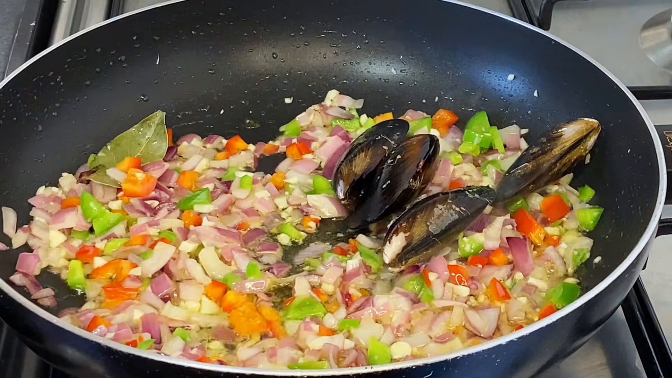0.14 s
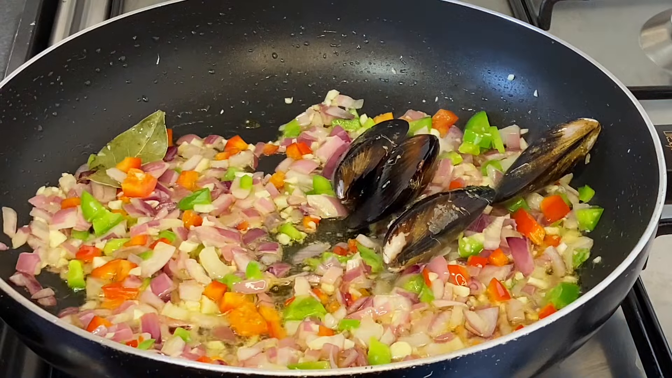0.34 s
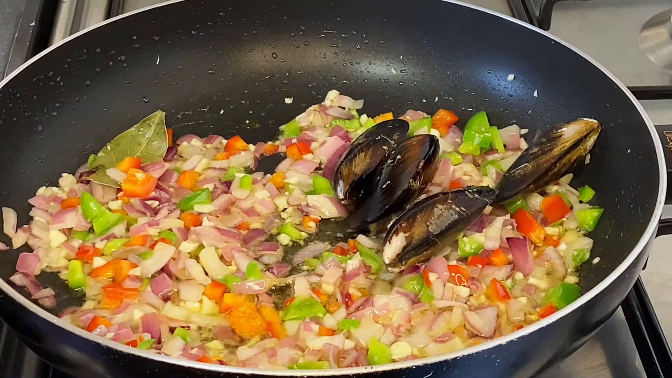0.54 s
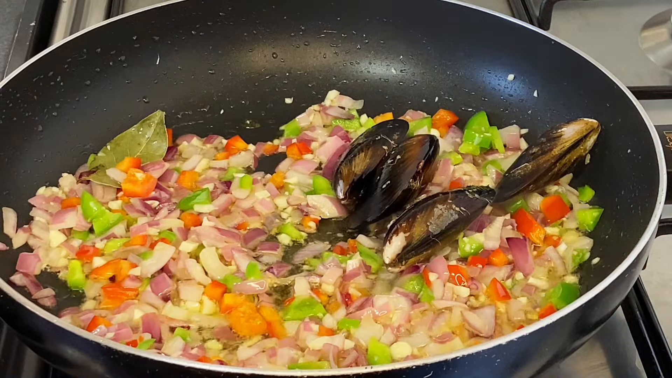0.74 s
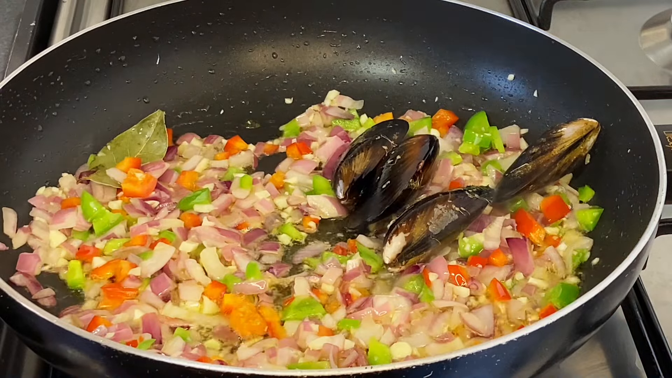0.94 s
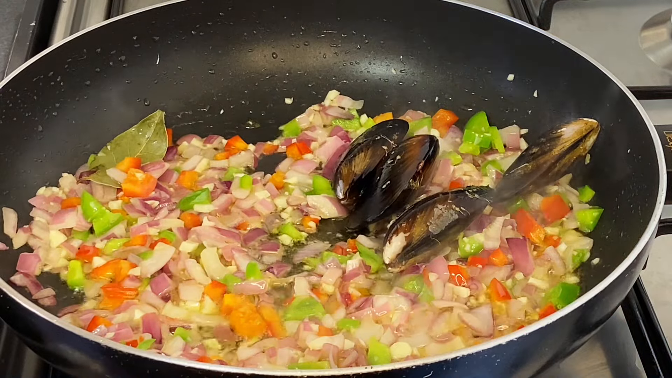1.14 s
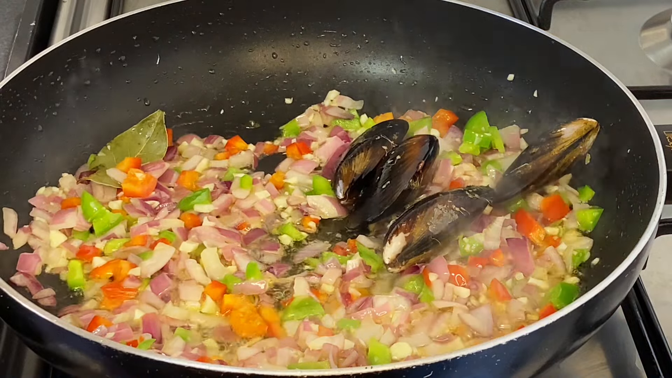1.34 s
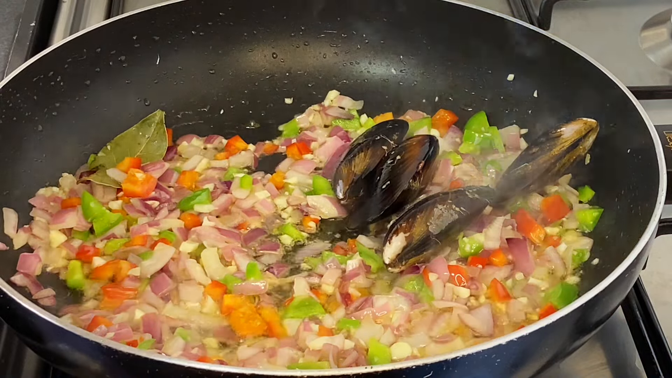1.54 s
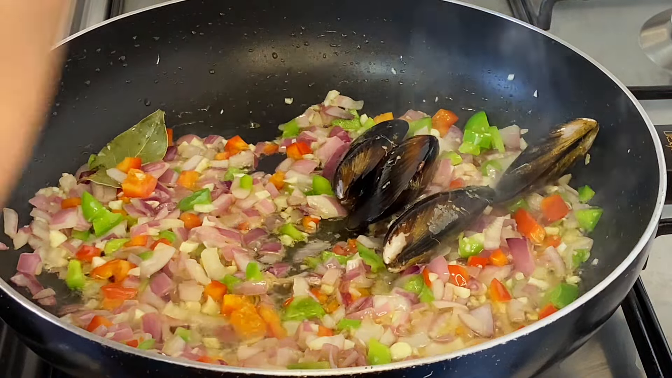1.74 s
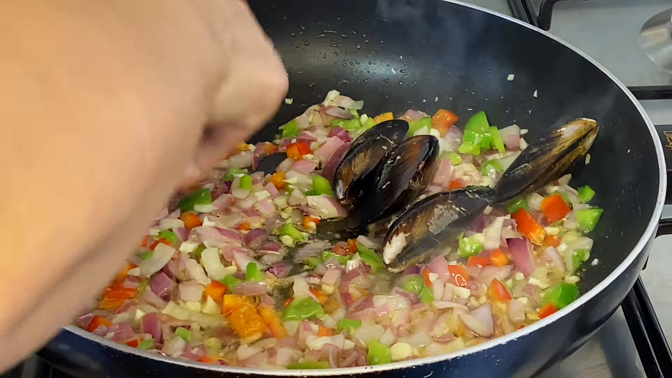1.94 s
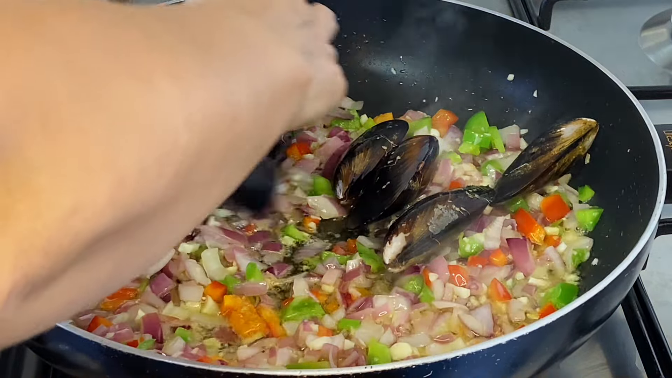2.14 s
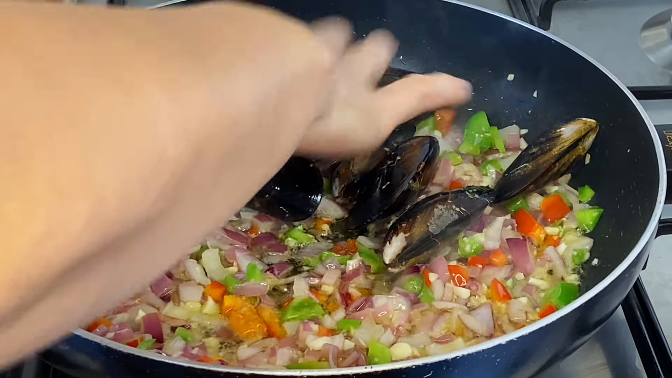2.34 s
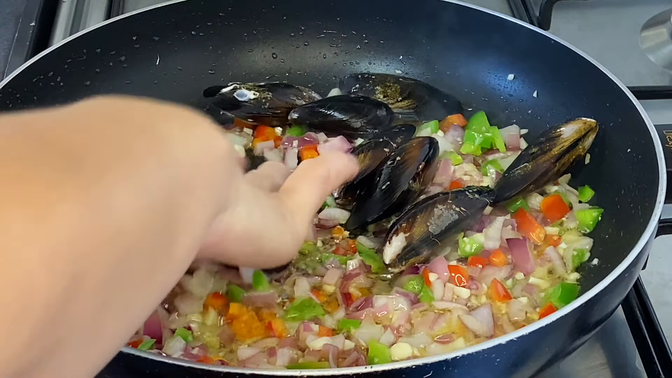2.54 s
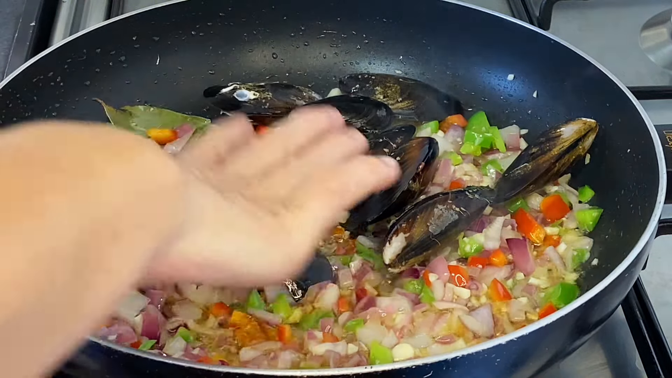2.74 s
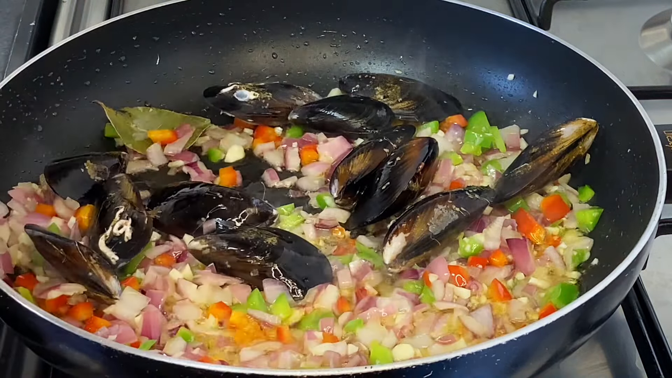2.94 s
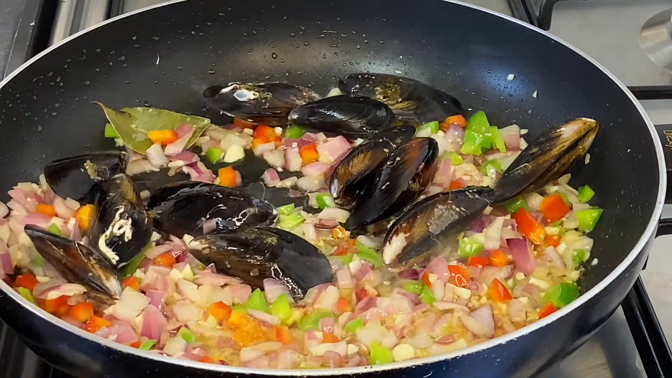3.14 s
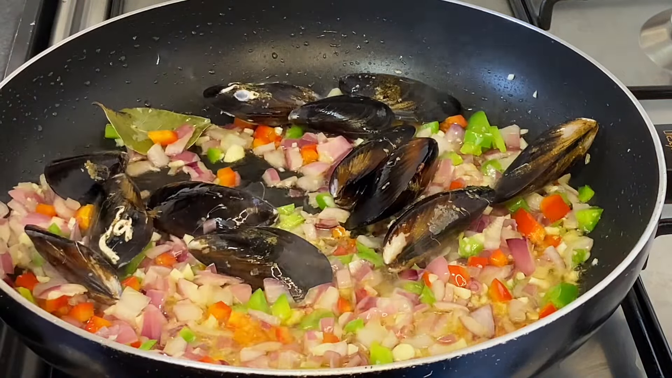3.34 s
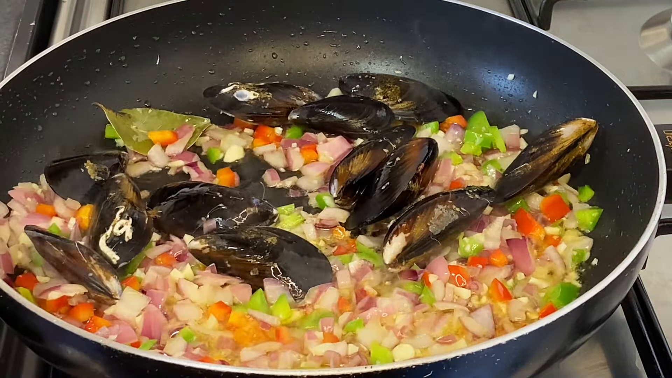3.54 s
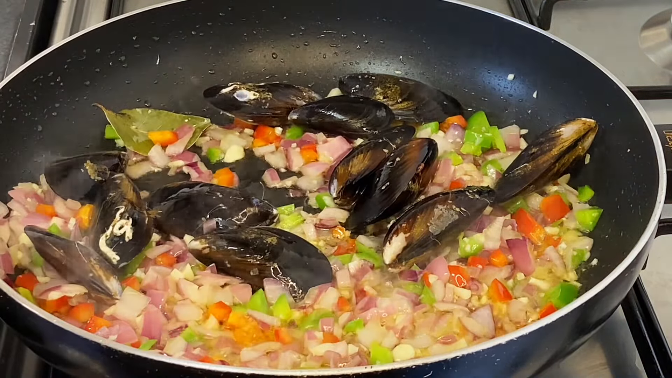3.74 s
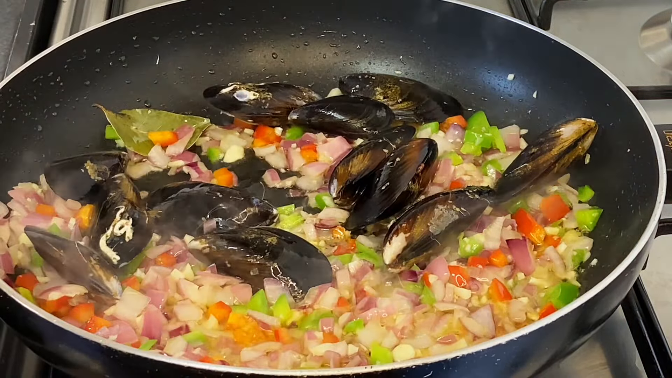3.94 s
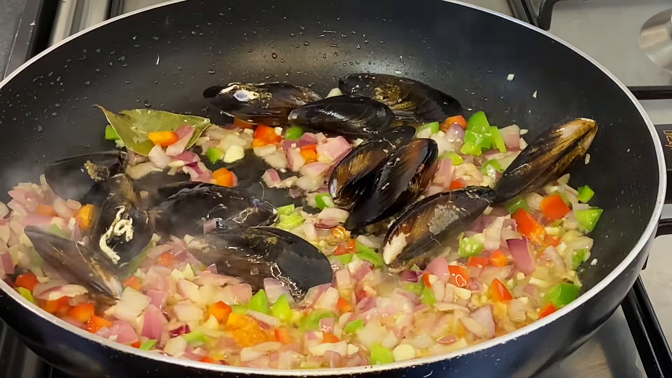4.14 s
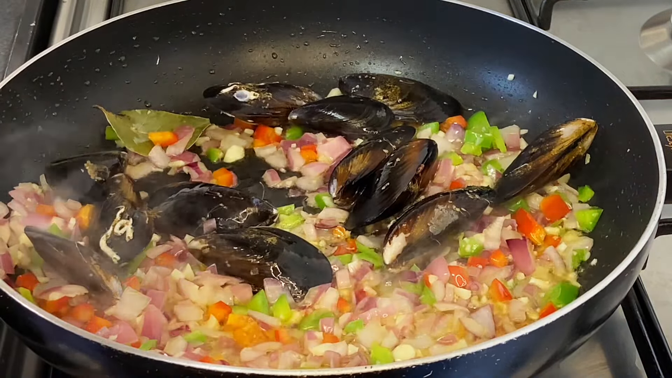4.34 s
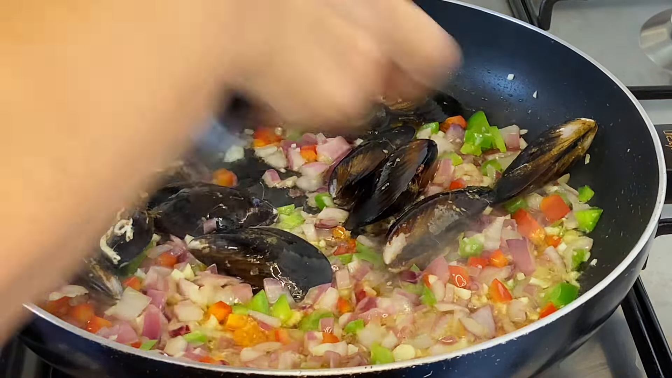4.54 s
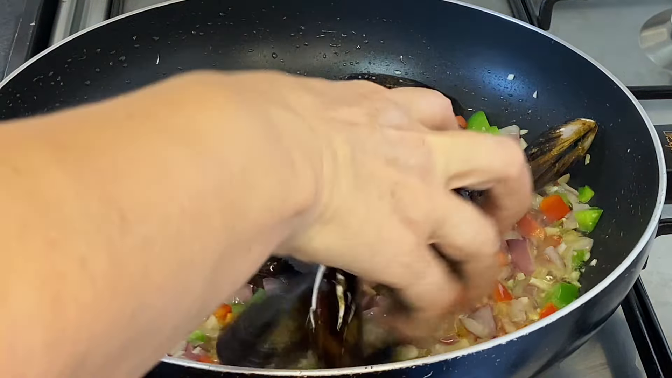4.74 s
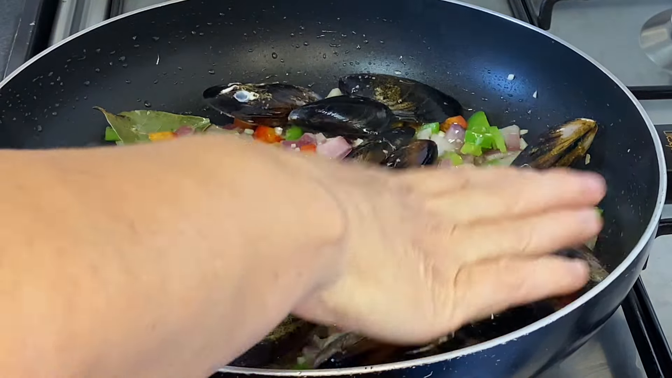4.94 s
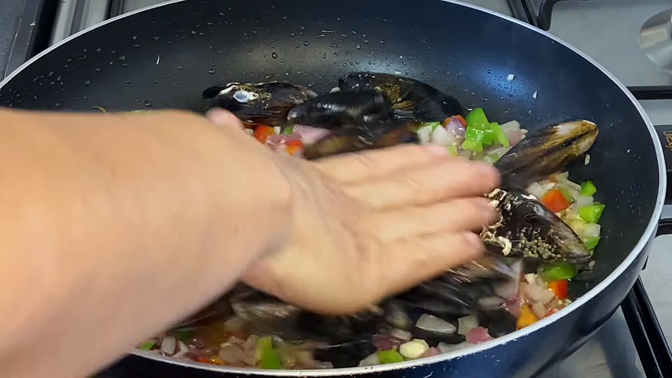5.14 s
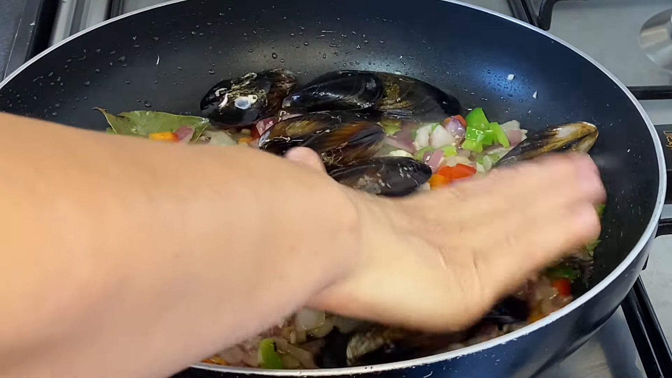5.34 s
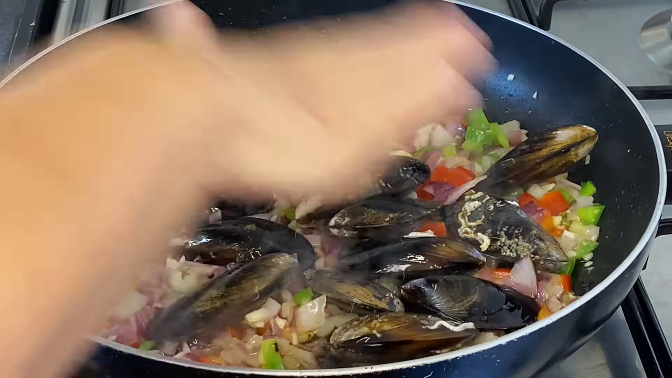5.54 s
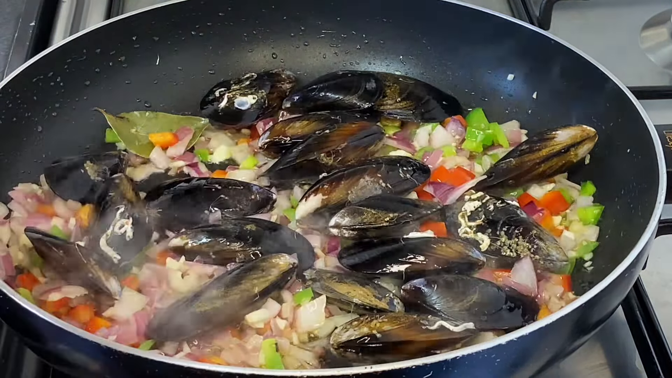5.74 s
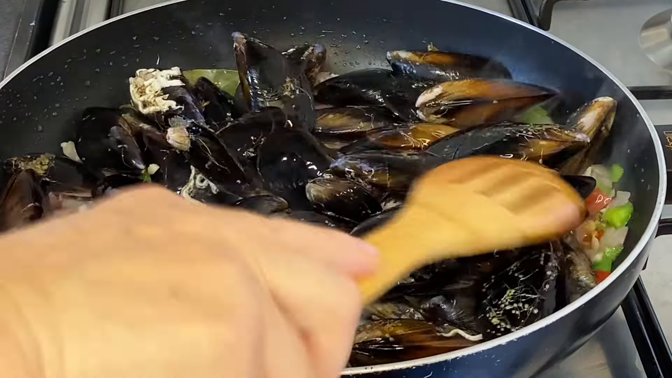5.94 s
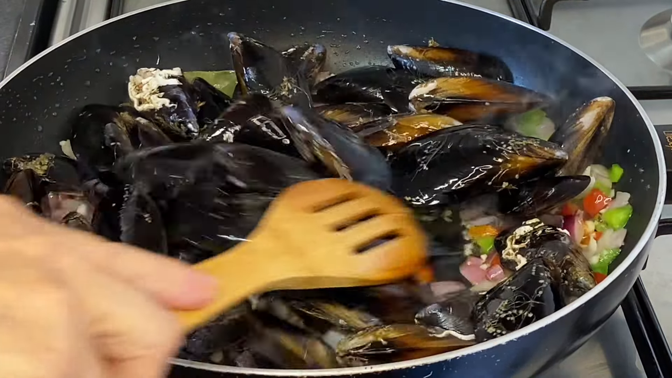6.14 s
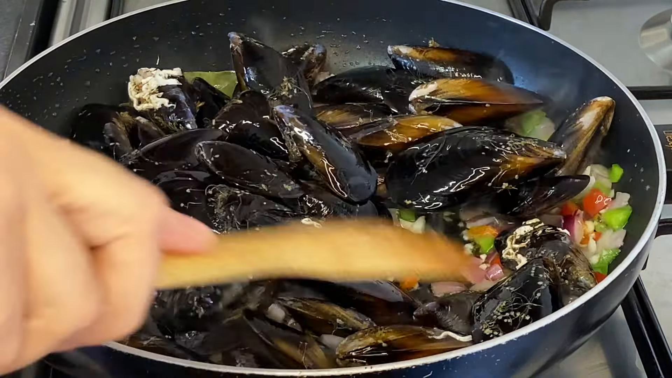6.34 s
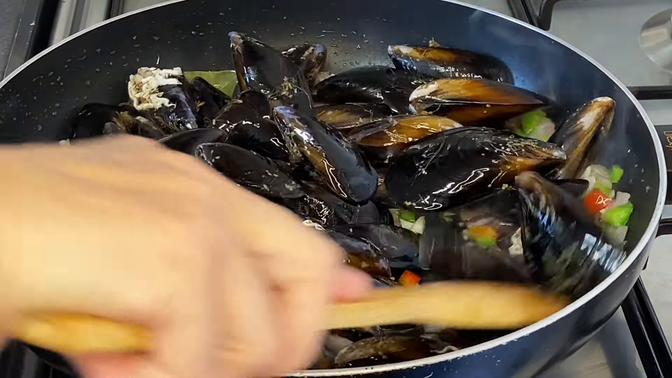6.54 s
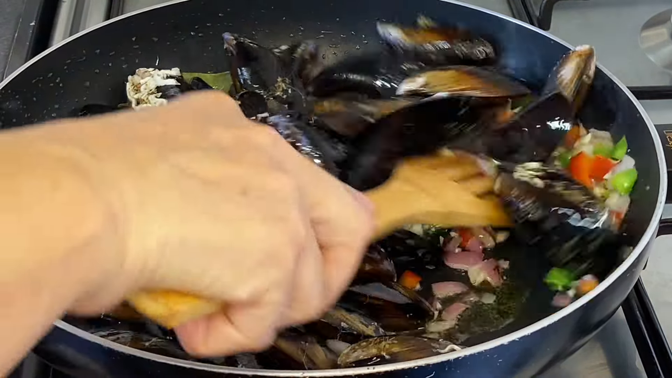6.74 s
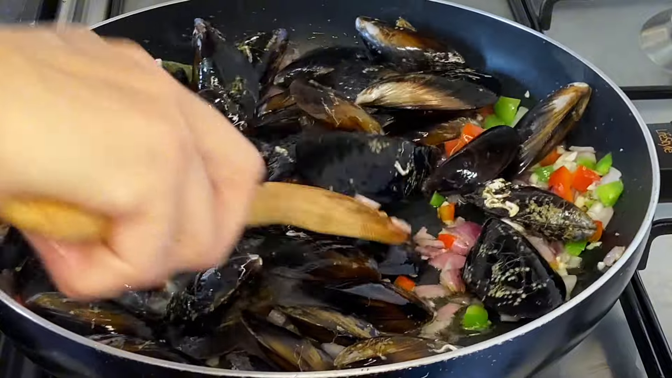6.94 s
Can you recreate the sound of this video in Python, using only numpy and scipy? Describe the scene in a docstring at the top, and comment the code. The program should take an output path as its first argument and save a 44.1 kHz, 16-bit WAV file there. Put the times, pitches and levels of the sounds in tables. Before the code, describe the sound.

A close frying pan of onions and peppers sizzles steadily over a low gas flame. Beside it, mussel shells knock and rub in a bowl, then a handful drops with sharp clacks, short damped metal rings and dull thuds. More bowl rattling follows, then a second handful lands. Finally a wooden spatula bumps the pan and turns the shells with scrapes and taps. Small kitchen, close stereo microphone.

```python
"""Mussels drop into a frying pan in two handfuls: each shell clacks, rings the metal and thuds.
Then a wooden spatula knocks on the pan and stirs the shells, which slide, scrape and tap each other.
Before each handful a hand gathers mussels from a bowl beside the hob, and the shells knock together.
Onions and peppers sizzle throughout as tiny bursts of noise; behind them are a gas flame and a low hum.
Blows are short noise bursts through resonances, ringing is dying sine waves, and echoes add a small kitchen."""
import sys
import numpy as np
from scipy import signal
from scipy.fft import rfft, irfft
from scipy.io import wavfile
from scipy.ndimage import map_coordinates

SR = 44100
rng = np.random.default_rng(int(sys.argv[2]) if len(sys.argv) > 2 else 0)


def pcm_store(signal):
    """Save signal as 16-bit PCM."""
    levels = np.round(np.clip(np.atleast_2d(signal), -1, 1) * 32767)
    wavfile.write(sys.argv[1], SR, levels.astype(np.int16).T)


N = 312210
NOW = np.arange(N) / SR  # time within the scene, s
T = np.arange(SR // 2) / SR  # time within one blow, s
# In every table of events, levels are set before the echoes and any overall gain of that layer.


def amp(db):
    """Turns decibels into gain."""
    return 10 ** (np.asarray(db) / 20)


def evened(x):
    """Scales a sound to rms 1."""
    return x / np.sqrt(np.mean(x ** 2) + 1e-20)


def struck(x):
    """Scales a short sound to the energy of 4 ms at rms 1."""
    return x / np.sqrt(np.sum(x ** 2) / (.004 * SR) + 1e-20)


def read(points, hz):
    """Reads a table between its points, on a log-frequency axis."""
    f, value = np.transpose(points)
    return np.interp(np.log(hz + 1), np.log(f + 1), value)


def colour(x, points):
    """Filters a sound by a table of (frequency [Hz], level [dB])."""
    gain = amp(read(points, np.fft.rfftfreq(N, 1 / SR)))
    return irfft(rfft(x) * gain, N)


def band(x, hz, octaves, order=1):
    """Keeps a band around one pitch, like a broad resonance."""
    edges = np.clip([hz / 2 ** (octaves / 2), hz * 2 ** (octaves / 2)], 10, SR / 2 - 10)
    return signal.sosfilt(signal.butter(order, edges, "band", fs=SR, output="sos"), x)


def low_cut(x, hz):
    """Removes bass, since small things radiate little of it."""
    return signal.sosfilt(signal.butter(2, hz, "high", fs=SR, output="sos"), x)


def add(mix, s, sound):
    """Mixes a sound in at time s."""
    part = mix[max(round(s * SR), 0):][:len(sound)]
    part += sound[:len(part)]


def grains(per_s, spread_db):
    """Makes clicks at random times, of random sign and varied size."""
    size = amp(spread_db * np.minimum(rng.exponential(1, N), 5))
    sign = rng.choice([-1, 1], N)
    return size * sign * (rng.random(N) < per_s / SR)


def chatter(t60, first):
    """One contact, a few milliseconds of rocking, then a dying rattle."""
    late = np.hypot(T, .003)
    push = evened(rng.standard_normal(len(T)) * amp(-60 * late / max(t60, .003)))
    return push + first * np.sqrt(len(T)) * (T == 0)


def ring(modes, scatter_db):
    """Dying modes; their strengths and tuning shift with where the blow lands and how the load lies."""
    out = np.zeros(len(T))
    for hz, db, t60 in modes:
        sign = rng.choice([-1, 1])
        decay = amp(db + scatter_db * rng.standard_normal() - 60 * T / t60)
        tuned_hz = hz * (1 + .003 * rng.standard_normal())
        out += sign * decay * np.sin(2 * np.pi * tuned_hz * T)
    return struck(out)


def answer(modes, pitches, reach):
    """A vessel's ring: modes within reach (octaves) of the blow's pitches take most of its energy."""
    driven = []
    for f, db, t60 in modes:
        power = sum(amp(push_db) ** 2 / (1 + (np.log2(f / hz) / reach) ** 2) for hz, push_db in pitches)
        driven.append((f, db + 10 * np.log10(power), t60))
    return ring(driven, scatter_db=2)


# the soft bump of the mussel's filled body under a 1 kHz clack; weaker in small, high shells
FLESH_HZ, FLESH_DB, FLESH_DB_PER_OCTAVE = 565, -10.5, -3


def shell(hollow_hz, edge_hz, edge_db, t60):
    """A mussel's clack: the hollow of the shell, its brighter hard edge and the bump of its body."""
    hollow = low_cut(band(chatter(t60, first=0.83), hollow_hz, octaves=0.69), hz=360)
    edge = band(chatter(t60 * 0.28, first=0.13), edge_hz, octaves=0.44)
    edge = band(edge, hz=4830, octaves=5.2)
    body = band(chatter(t60=0.018, first=0.055), FLESH_HZ, octaves=0.49, order=2)
    body_db = FLESH_DB + FLESH_DB_PER_OCTAVE * np.log2(hollow_hz / 1000)
    return struck(hollow) + amp(edge_db) * struck(edge) + amp(body_db) * struck(body)


# shells landing in the pan or tumbling over the spatula: (time [s], level [dB], hollow pitch [Hz],
# edge pitch [Hz], edge against hollow [dB], chatter t60 [s], pan ring against clack [dB])
LANDINGS = [(2.093, -25, 1790, 4330, -7, 0.036, -7.5), (2.107, -27, 1800, 3700, 0, 0.033, -4),
            (2.1282, -13.5, 1330, 4570, 2.5, 0.039, -6.5), (2.224, -13.5, 2100, 3830, -6, 0.0038, -29),
            (2.261, -18.5, 1490, 2600, -2, 0.026, -6), (2.537, -24, 800, 3250, -15, 0.16, -5.5),
            (4.666, -15.5, 930, 4200, 1.5, 0.13, -11), (4.7202, -13, 1020, 3400, -11.5, 0.035, -5),
            (4.836, -18, 930, 5340, 8, 0.035, -6), (4.999, -26.5, 750, 3430, -2.5, 0.029, -8),
            (5.236, -25.5, 1680, 4610, -19, .0054, -5), (5.27, -25, 1280, 3480, 3.5, 0.018, -12),
            (5.319, -26, 1150, 2870, -5.5, 0.037, -0.5), (5.9818, -16, 2810, 5100, -1.5, 0.0045, -12.5),
            (6.031, -35, 1900, 2300, -8, 0.017, -13), (6.049, -30, 2100, 3100, 0, .02, -7),
            (6.092, -26.5, 1500, 2900, -8, .025, -4), (6.113, -29.5, 1300, 2200, 2, 0.033, 1),
            (6.1438, -19.5, 2120, 2760, -10, 0.0035, -12), (6.1808, -22, 1920, 4600, -7.5, 0.011, -4),
            (6.4377, -13, 2600, 4700, -1.5, 0.014, -9), (6.694, -24.5, 1080, 3250, -6, .012, -5),
            (6.713, -28.5, 1100, 3300, 0, 0.013, -4), (6.731, -24, 890, 1900, -14, 0.0072, -9),
            (6.755, -27.5, 750, 1600, -7, .012, -10), (6.771, -37, 1100, 2000, -9, .008, -12),
            (6.875, -28, 830, 2100, 0, 0.0094, -14), (6.978, -26, 900, 2400, -7, .012, -11)]
# ringing tones of the pan, before the food damps them: (pitch [Hz], level [dB], t60 [s])
PAN_MODES = [(775, 4, .16), (1045, 4, .16), (1255, 2, .16), (1598, 0, .14), (1787, 0, .5), (2240, 0, .1),
             (2590, -3, .12), (2885, 2.5, .22), (3493, -1, .22), (4090, -1, .14), (4842, 3, .26),
             (5395, -1, .14), (6010, 1, .24), (6360, -4, .16), (6950, -1, .18)]
FOOD_DAMPING_S = .055  # time constant; the food cuts the pan's ring short
# the thud of a 1 kHz shell; small, high shells weigh less; the food delays the thud
THUD_DB, THUD_DB_PER_OCTAVE, THUD_DELAY_S = -13, -5.5, 0.00713


def drops():
    """Shells hit the pan: a clack, ringing metal and a thud that grows with the size of the shell."""
    clacks, rings = np.zeros((2, N))
    for s, db, hollow_hz, edge_hz, edge_db, t60, ring_db in LANDINGS:
        add(clacks, s, amp(db) * shell(hollow_hz, edge_hz, edge_db, t60))
        thud_db = db + THUD_DB + THUD_DB_PER_OCTAVE * np.log2(hollow_hz / 1000)
        add(clacks, s + THUD_DELAY_S, amp(thud_db) * thud())
        metal = answer(PAN_MODES, [(hollow_hz, 0), (edge_hz, edge_db)], reach=0.4)
        metal = metal * np.exp(-T / FOOD_DAMPING_S)
        add(rings, s, amp(db + ring_db) * np.hypot(1, amp(edge_db)) * metal)
    return amp(-6.3) * clacks, amp(-0.5) * rings


# tones of the loaded pan on its grate, before the food damps them: (pitch [Hz], level [dB], t60 [s])
GRATE_MODES = [(55, 1.5, .7), (137, 3, 0.44), (196.5, 4.5, 0.61), (230.7, 7, 0.31), (306, 5.5, 0.49),
               (356, 8.5, 0.22), (412, -0.5, 0.28), (589, -2, 0.12)]
GRATE_DAMPING_S = 0.073  # time constant; the food stops the rocking quickly


def thud():
    """The loaded pan rocks on its grate; the food damps it quickly and gives with a dull puff."""
    rocking = struck(ring(GRATE_MODES, scatter_db=2) * np.exp(-T / GRATE_DAMPING_S))
    puff = struck(band(chatter(t60=0.054, first=0.11), hz=189, octaves=4.1, order=2))
    return amp(2.5) * rocking + amp(1.5) * puff


# dull knocks of soft landings and of the spatula:
# (time [s], level [dB], pitch [Hz], t60 of the blow [s], grate ring against blow [dB])
SOFT_BLOWS = [(2.163, -29, 283, 0.1, -6), (2.283, -40, 413, .06, -8), (2.302, -37, 62, 0.18, 10),
              (2.42, -30.5, 338, 0.059, -8), (4.885, -35, 246, 0.21, -4), (5.448, -32, 520, 0.14, 0.5),
              (5.881, -42, 54, .1, 18), (5.8833, -40, 224, .04, 17), (5.884, -28, 455, 0.15, -4.5),
              (5.982, -33, 590, 0.04, -9), (6.164, -23, 380, 0.18, -1.5), (6.166, -37, 128, .1, 13),
              (6.551, -35.5, 160, 0.25, -4), (6.854, -35, 220, 0.083, -2)]


def knocks():
    """Soft blows give a dull bump and rock the pan on its grate."""
    bumps, rings = np.zeros((2, N))
    for s, db, hz, t60, ring_db in SOFT_BLOWS:
        add(bumps, s, amp(db) * struck(band(chatter(t60, first=0.69), hz, octaves=1.0, order=2)))
        rocking = answer(GRATE_MODES, [(hz, 0)], reach=.11) * np.exp(-T / GRATE_DAMPING_S)
        add(rings, s, amp(db + ring_db) * struck(rocking))
    return bumps, rings


# soft touches that sound one round note, in a gaping shell or the spatula's blade:
# (time [s], level [dB], starting pitch [Hz], t60 [s])
ROUND_NOTES = [(.653, -26, 2180, 0.026), (.668, -30, 1830, .06), (.911, -27, 1254, 0.036),
               (.958, -21, 1037, 0.067), (1.39, -34, 1390, 0.024), (1.608, -25.5, 1030, 0.077),
               (1.639, -31, 970, 0.071), (2.261, -26.5, 1490, 0.0078), (2.2705, -22.5, 1690, 0.017),
               (3.234, -35, 877, 0.063), (3.952, -27, 787, 0.089), (3.956, -30, 1194, 0.058),
               (5.32, -28.5, 1150, 0.037), (5.982, -33, 1190, 0.032), (6.156, -13.5, 680, 0.018),
               (6.642, -29.5, 793, 0.055)]
# soft start; the pitch creeps up by this share per second as the shell closes
TOCK_RISE_S, TOCK_GLIDE_PER_S = .0008, .8
# the shell keeps rubbing while it sounds, so the note flutters: phase wobble [rad], its top frequency
TOCK_ROUGH, TOCK_FLUTTER_HZ = .55, 260


def tocks():
    """The hollow of a gaping shell, or the spatula's blade, gives one short, rough-edged note."""
    out = np.zeros(N)
    slow_only = signal.butter(2, TOCK_FLUTTER_HZ, fs=SR, output="sos")
    for s, db, hz, t60 in ROUND_NOTES:
        flutter = TOCK_ROUGH * evened(signal.sosfilt(slow_only, rng.standard_normal(len(T))))
        note = np.sin(2 * np.pi * hz * (T + TOCK_GLIDE_PER_S * T ** 2 / 2) + flutter)
        envelope = (1 - np.exp(-T / TOCK_RISE_S)) * amp(-60 * T / t60)
        add(out, s, amp(db) * struck(note * envelope))
    return out


# shells knocking in the bowl: (time [s], level [dB], hollow pitch [Hz], edge pitch [Hz],
# edge against hollow [dB], bowl ring against clack [dB])
BOWL_KNOCKS = [(.089, -25, 2940, 4130, -6, -18), (0.195, -47, 1800, 5000, 18, 3.5),
               (.271, -26, 1500, 2900, -4, -13), (.288, -26, 1150, 3600, 1.5, -13),
               (0.315, -30, 1300, 6580, 1.5, -1.5), (0.652, -24.5, 2120, 4100, -4.5, -18),
               (.759, -25, 2120, 6800, 2, -10), (0.82, -27.5, 1600, 3670, 0, -13),
               (.832, -28, 1410, 3460, -11, -13), (0.928, -26.5, 1600, 2600, -22, -20),
               (0.977, -25.5, 1290, 3540, -15, -23), (1.016, -27, 2250, 6750, 1.5, -8),
               (1.261, -30.5, 1470, 2900, -8, -5), (1.484, -35, 820, 3470, 4.5, -9),
               (1.532, -32, 1760, 4000, 6, -10), (1.608, -29, 925, 4800, 2, -19),
               (3.235, -32, 870, 2600, -13, -5), (3.269, -25.5, 2200, 3300, -14, -20),
               (3.293, -32.5, 700, 4440, 0.5, -2), (3.401, -33, 810, 2600, -15, -18),
               (3.491, -37, 1000, 3600, 4, -19), (3.529, -32, 2100, 4400, 6.5, 1),
               (3.568, -28.5, 1190, 2400, -11, -18), (3.818, -38.5, 1100, 5800, 9, -6),
               (3.853, -27, 1640, 4050, -4, 4), (3.951, -24, 870, 2400, -7, -18),
               (3.974, -31.5, 2300, 4000, -5, -12), (4.017, -25.5, 2230, 2680, -15, -25),
               (4.113, -32.5, 2700, 3700, -4, -14)]
# ringing tones of the bowl: (pitch [Hz], level [dB], t60 [s])
BOWL_TONES = [(825, -3, .1), (1068, 1, .16), (1243, -3, .12), (1894, -2, .17), (2293, -5, .12),
              (2927, 1, .22), (4140, 2, .15), (5507, -2, .15), (6524, -2, .14), (7035, -2, .17),
              (8000, -7, .09)]
BOWL_CHATTER_S, BOWL_RING_DB = 0.035, -2  # rattle t60 of each knock; gain of all the bowl's ringing


def bowl():
    """Shells knock together as the hand gathers them; those that hit the wall make the bowl ping."""
    clacks, pings = np.zeros((2, N))
    for s, db, hollow_hz, edge_hz, edge_db, ring_db in BOWL_KNOCKS:
        add(clacks, s, amp(db) * shell(hollow_hz, edge_hz, edge_db, BOWL_CHATTER_S))
        ping = answer(BOWL_TONES, [(hollow_hz, 0), (edge_hz, edge_db)], reach=0.45)
        add(pings, s, amp(db + ring_db) * np.hypot(1, amp(edge_db)) * ping)
    return amp(-4.0) * clacks, amp(BOWL_RING_DB) * pings


# shells dragged over each other or pushed by the spatula:
# (time when strongest [s], build-up [s], level [dB], pitch [Hz], glide [octaves per s])
DRAGS = [(0.13, .008, -32.5, 2000, -55.5), (.285, 0.023, -31.5, 2020, 0.5), (0.545, 0.06, -37, 1250, -4.5),
         (0.656, 0.17, -41.5, 2130, -6), (.951, 0.063, -36, 1210, -9), (3.55, 0.022, -32.5, 1720, -12),
         (3.84, 0.033, -36.5, 905, 0), (3.99, 0.081, -37, 1600, 0.5), (4.108, 0.051, -41.5, 2500, 10),
         (5.2, 0.089, -43, 800, 4.5), (6.04, 0.025, -42, 2200, 0), (6.129, 0.051, -32, 1960, 0.5),
         (6.53, 0.038, -43.5, 494, -0.5), (6.955, 0.066, -35, 2170, -5)]
SCRAPE_OCTAVES, SCRAPE_SWING_OCTAVES = 0.99, 0.96  # width of the resonance; how far it can glide


def scrapes():
    """Slips build up under pressure and stop as the shell comes free; pitch glides as contact moves."""
    out = np.zeros(N)
    for s, build, db, hz, glide in DRAGS:
        t = T - min(s, .3)
        slips = rng.standard_normal(len(t)) * (rng.random(len(t)) < 1200 / SR)
        pressure = np.exp(-(t / np.where(t < 0, build, .018)) ** 2)
        rasp = low_cut(band(slips, hz, SCRAPE_OCTAVES), hz=382)
        # reading the rasp faster or slower moves its pitch
        speed = 2 ** np.clip(glide * t, -SCRAPE_SWING_OCTAVES, SCRAPE_SWING_OCTAVES)
        glided = map_coordinates(rasp, [np.cumsum(speed)], mode="wrap")
        add(out, s + t[0], amp(db - 3) * pressure * evened(glided))
    return out


# moves of hand or spatula that keep the shells shifting: (start [s], end [s], level [dB])
HAND_MOVES = [(0.085, 1.142, -44), (1.367, 1.597, -41.5), (2.052, 2.44, -44), (3.188, 4.1, -46.5),
              (4.673, 5.378, -46), (5.97, 6.18, -36), (6.425, 6.645, -40), (6.70, 6.943, -39)]
MOVE_ATTACK_S, MOVE_RELEASE_S = 0.0097, 0.077  # rise time; time constant of settling


def motion():
    """How strongly the shells shift: each move rises, holds and settles."""
    strength = np.zeros(N)
    for start, end, db in HAND_MOVES:
        rise = np.clip((NOW - start) / MOVE_ATTACK_S, 0, 1)
        settle = np.exp(-np.maximum(NOW - end, 0) / MOVE_RELEASE_S)
        strength += amp(db) * rise * settle
    return strength


JOSTLES_PER_S, JOSTLE_DB, JOSTLE_SPREAD_DB = 36, 0.5, 3  # level against the move; most it can vary
JOSTLE_HOLLOW_HZ, JOSTLE_EDGE_HZ, JOSTLE_OCTAVES = 1150, 2700, 0.53  # typical pitches; their scatter


def jostles(count=260):
    """Shifting shells of all sizes tap each other at random, as hard as they are moved."""
    out, strength = np.zeros(N), motion()
    times = np.cumsum(rng.exponential(1 / JOSTLES_PER_S, count))
    for s, (size, hollow, edge) in zip(times, rng.standard_normal((count, 3)).clip(-2, 2)):
        if s < NOW[-1]:
            hollow_hz = JOSTLE_HOLLOW_HZ * 2 ** (JOSTLE_OCTAVES * hollow)
            edge_hz = JOSTLE_EDGE_HZ * 2 ** (JOSTLE_OCTAVES * edge)
            clack = shell(hollow_hz, edge_hz, edge_db=-4.0, t60=0.046)
            gain = amp(JOSTLE_DB + JOSTLE_SPREAD_DB * np.tanh(size))
            add(out, s, strength[int(s * SR)] * gain * clack)
    return out


# hollow side of sliding shells: (frequency [Hz], level [dB])
HOLLOW_RUB = [(150, -4.5), (400, -9.5), (650, -1), (1050, -1.5), (1500, -4), (2500, -4.5), (6000, -14),
              (16000, -50)]
# their hard edges: (frequency [Hz], level [dB])
EDGE_GRIT = [(300, -31), (1200, -21), (2100, 4), (3200, 36), (6000, -6), (9000, -1), (16000, -22)]
GRIT_DB = -23  # hard edges against the hollow side


def sliding():
    """Rough shells catch and slip against each other and the spatula."""
    slips = grains(per_s=2500, spread_db=6.0)
    hollow = evened(colour(slips, HOLLOW_RUB))
    edges = evened(colour(slips + grains(per_s=2700, spread_db=-3.0), EDGE_GRIT))
    return amp(-7.5) * motion() * (hollow + amp(GRIT_DB) * edges)


# the sizzle swells when wet shells reach the oil: (time [s], size of the swell [dB])
OIL_SWELLS = [(2.15, 3.5), (5.95, 1), (6.55, 1.5)]
SWELL_S, FADE_S = 0.33, 10  # time constants of the swell and of its very slow fading
FRY_DB = -43  # the sizzle before lulls and swells
LULLS_S, LULL_DB, LULL_WIDTH_S = [1.86, 4.45], -2, 0.44  # the sizzle sinks just before each handful


def frying_db():
    """The sizzle swells when wet shells reach the oil, then stays raised, fading only very slowly."""
    db = FRY_DB + sum(LULL_DB * np.exp(-((NOW - s) / LULL_WIDTH_S) ** 2) for s in LULLS_S)
    for s, rise_db in OIL_SWELLS:
        age = np.maximum(NOW - s, 0)
        db = db + rise_db * (1 - np.exp(-age / SWELL_S)) * np.exp(-age / FADE_S)
    return db


# spits of hot oil: (time [s], level [dB])
OIL_SPITS = [(1.5187, -20.5), (2.45, -25), (3.133, -29)]
# tone of the sizzle: (frequency [Hz], level [dB])
SIZZLE_TONE = [(150, -3), (500, -4.5), (800, -0.5), (1200, -7), (2200, 1), (4000, 1.5), (7000, 1.5),
               (9000, -1.5), (11000, -2), (13000, -3.5), (15800, -6)]


def sizzle():
    """Thousands of tiny steam bubbles burst in the oil; now and then a drop spits."""
    bubbles = grains(per_s=14000, spread_db=2.5)
    out = amp(frying_db()) * evened(colour(bubbles, SIZZLE_TONE))
    for s, spit_db in OIL_SPITS:
        spit = low_cut(chatter(t60=0.058, first=1.0), hz=2400)
        add(out, s, amp(spit_db - 3.5) * struck(spit))
    return out


# tone of the flame's rumble: (frequency [Hz], level [dB])
FLAME_TONE = [(20, -26), (36, -19), (54, 11.5), (75, 1), (95, -7), (130, 3), (170, -8), (230, -17.5),
              (300, -8), (500, -26), (1200, -11), (4000, -83)]
# a low hum that sinks midway: starting level, when it starts to sink, how long that takes, how far
HUM_DB, HUM_UNTIL_S, HUM_FADE_S, HUM_DROP_DB = -52.5, 2.85, 0.69, -8


def hob():
    """The gas flame rumbles and its jet sings faintly, beside a wavering hum."""
    rumble, jet, drone = rng.standard_normal((3, 2, N))
    flame = amp(-48.0) * evened(colour(rumble, FLAME_TONE))
    # a little of each channel goes into the other
    singing = amp(-53.5) * evened(band(jet + 0.24 * jet[::-1], hz=1680, octaves=0.097))
    hum_db = HUM_DB + HUM_DROP_DB * np.clip((NOW - HUM_UNTIL_S) / HUM_FADE_S, 0, 1)
    hum = amp(hum_db) * evened(band(drone, hz=212.5, octaves=0.15, order=2))
    return flame + singing + hum


# how long the kitchen's echoes last: (frequency [Hz], t60 [s])
KITCHEN_DECAY = [(150, 0.58), (400, 0.4), (1000, 0.35), (3000, 0.31), (7000, 0.35), (15000, 0.21)]


def kitchen(x, wet_db, early_db):
    """The direct sound, quick echoes off the vessel's own walls, and a short tail in each channel."""
    taps = rng.standard_normal((2, len(T))) * (1 - np.exp(-T / 0.0044))
    hz, t, z = signal.stft(taps, SR, nperseg=256)
    fading = z * amp(-60 * t / read(KITCHEN_DECAY, hz)[:, None])
    tail = signal.istft(fading, SR, nperseg=256)[1][:, :len(T)]
    early = rng.standard_normal((2, len(T))) * (T > .0005) * np.exp(-T / .004)
    echoes = amp(wet_db) * tail / np.linalg.norm(tail[0])
    echoes = echoes + amp(early_db) * early / np.linalg.norm(early[0])
    return x + signal.fftconvolve(x[None], echoes, axes=1)[:, :N]


def roaming(x, wet_db, early_db, count=5):
    """Shells lie in different places, so their echoes pass from one pattern to the next, in a cycle."""
    turn = NOW / .09  # one pattern every 90 ms
    out = x
    for k in range(count):
        share = np.maximum(1 - abs((turn - k) % count - 1), 0)
        part = x * np.sqrt(share)
        out = out + kitchen(part, wet_db, early_db) - part  # the echoes alone
    return out


def narrowed(pair, points):
    """Scales the difference between two channels by a spectrum table."""
    mid = (pair[0] + pair[1]) / 2
    side = colour((pair[0] - pair[1]) / 2, points)
    return np.array([mid + side, mid - side])


# stereo width of the sizzle, wide in the lows and narrow around 2300 Hz:
# (frequency [Hz], gain of the channel difference [dB])
SIZZLE_WIDTH = [(300, 13.5), (1700, 2), (2300, -19), (16000, -5)]


def scene():
    """The pan is close; the bowl is further off, its clacks more roomy; ringing notes arrive clearest."""
    landings, pan_rings = drops()
    bumps, grate_rings = knocks()
    clacks, pings = bowl()
    pan = roaming(landings + bumps, wet_db=-2.5, early_db=-3)
    shells = roaming(clacks + jostles() + sliding() + scrapes(), wet_db=2.0, early_db=2.0)
    notes = roaming(tocks() + pan_rings + grate_rings + pings, wet_db=-6, early_db=-10)
    oil = narrowed(kitchen(sizzle(), wet_db=-12.0, early_db=-9.0), SIZZLE_WIDTH)
    return pan + shells + notes + oil + hob()


# stereo width of the whole sound: (frequency [Hz], gain of the channel difference [dB])
STEREO_WIDTH = [(60, -21), (160, -14), (330, -7), (800, -1), (1400, 0), (1900, -4.5), (2500, -32),
                (3200, -76), (3800, -65), (6000, -71), (16000, -21)]
# above the first frequency the right channel is late by LAG_S; its phase agrees again at the last one
LAG_ABOVE_HZ, LAG_S, IN_PHASE_HZ = 7400, .000236, 11150
EDGE_HZ = 15900  # upper band limit


def record(dry):
    """Wide mid range, narrow above, a phase turn in the top treble, softened peaks and a band limit."""
    left, right = narrowed(dry, STEREO_WIDTH)
    hz = np.fft.rfftfreq(N, 1 / SR)
    lag_cycles = LAG_S * (hz - IN_PHASE_HZ) * (hz > LAG_ABOVE_HZ)
    right = irfft(rfft(right) * np.exp(-2j * np.pi * lag_cycles), N)
    rounded = .6 * np.tanh(np.array([left, right]) / .6)  # the sharpest peaks are softened
    low_pass = signal.firwin(511, EDGE_HZ, window=("kaiser", 9), fs=SR)
    return signal.oaconvolve(rounded, low_pass[None], "same")


dry = scene()
out = record(dry)
pcm_store(out)
```